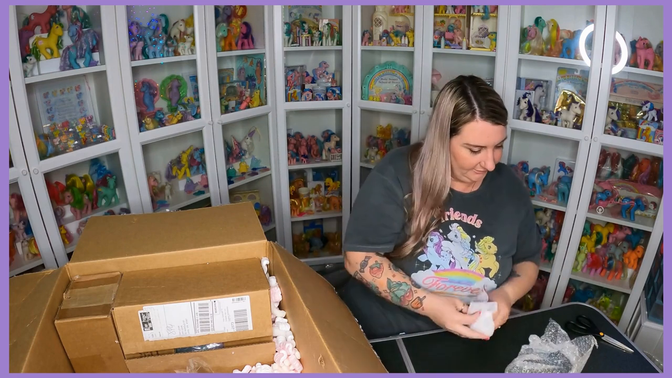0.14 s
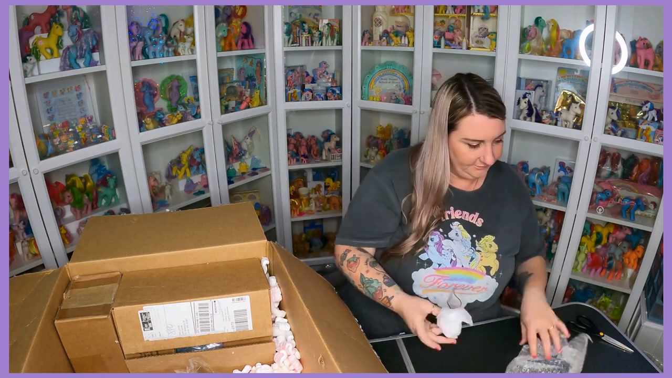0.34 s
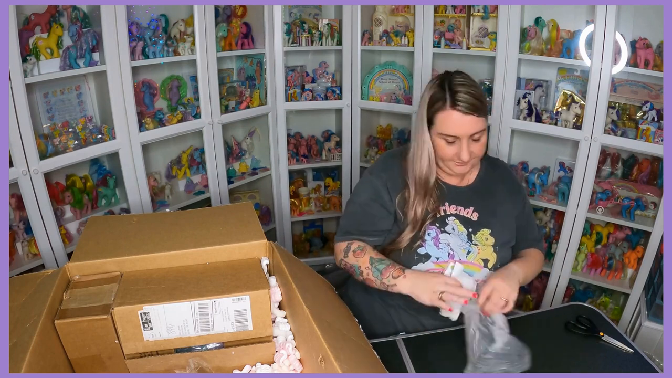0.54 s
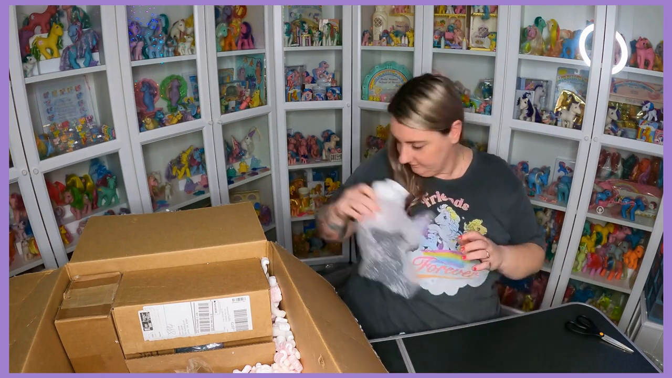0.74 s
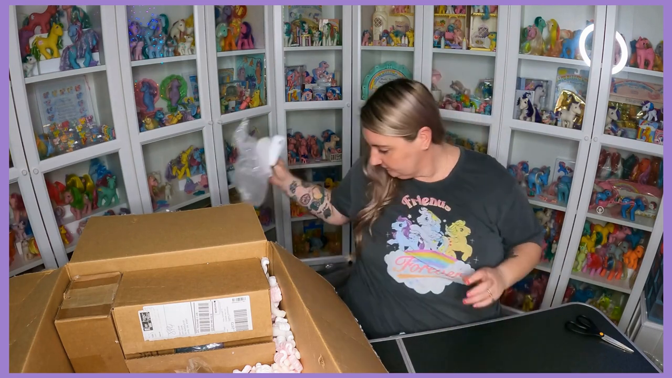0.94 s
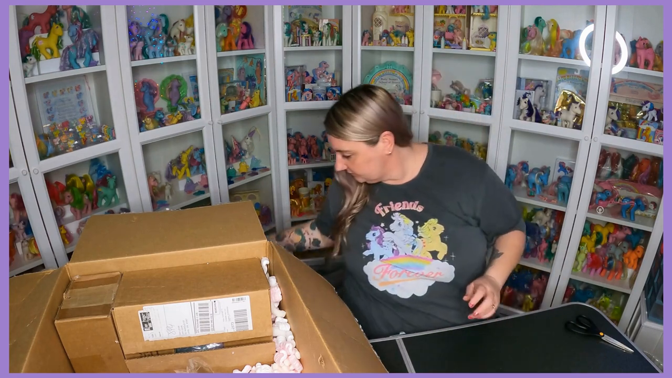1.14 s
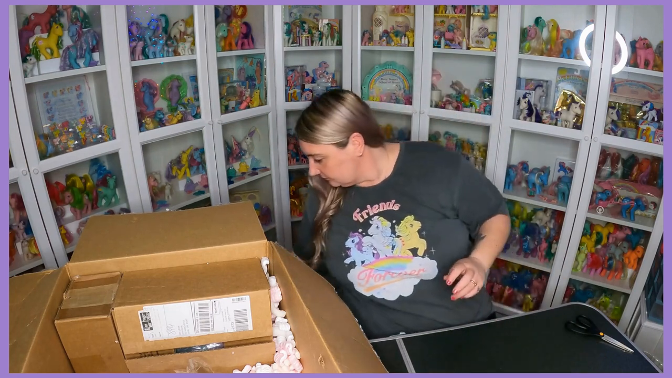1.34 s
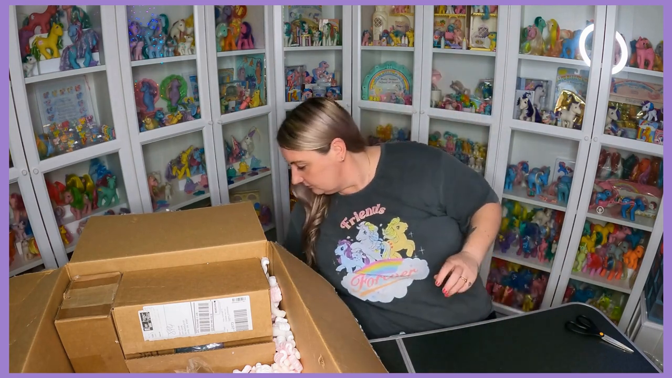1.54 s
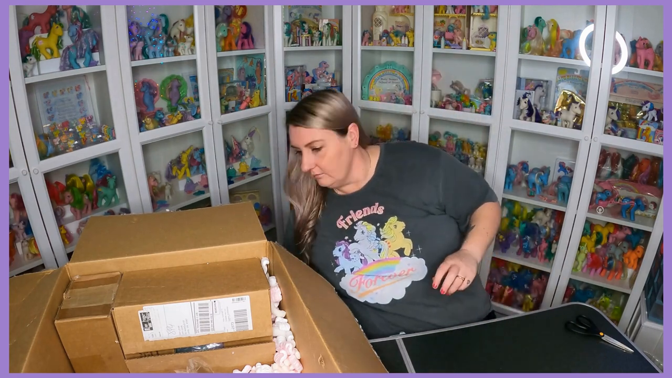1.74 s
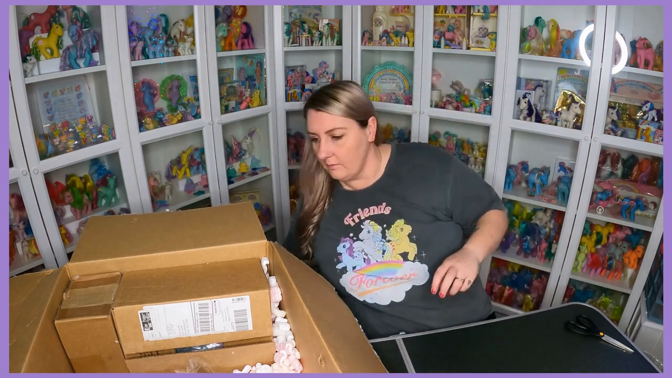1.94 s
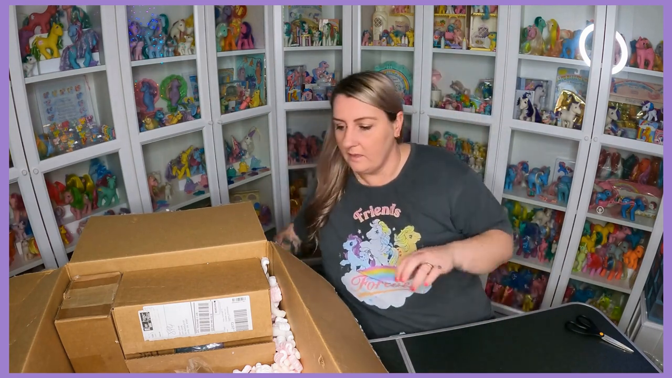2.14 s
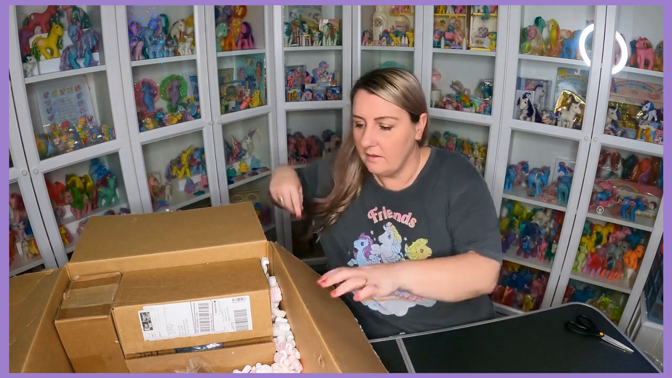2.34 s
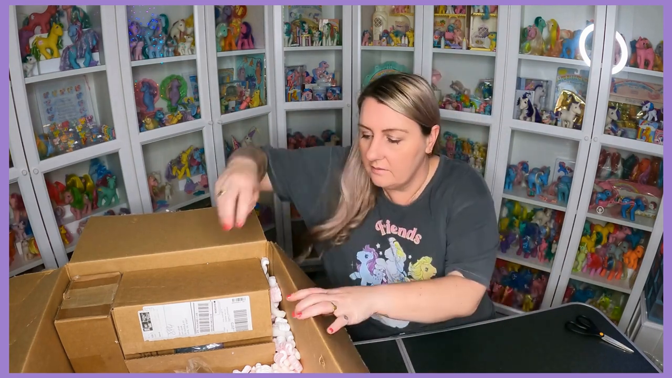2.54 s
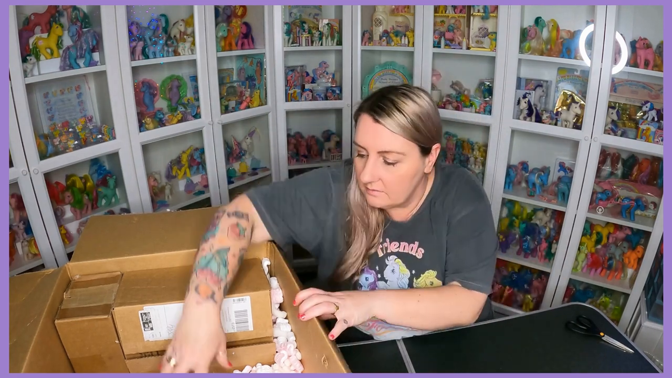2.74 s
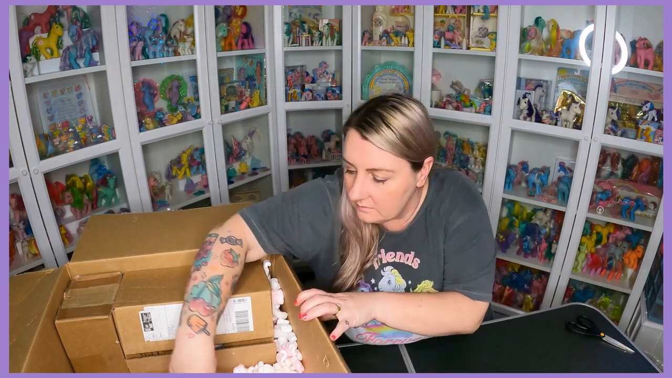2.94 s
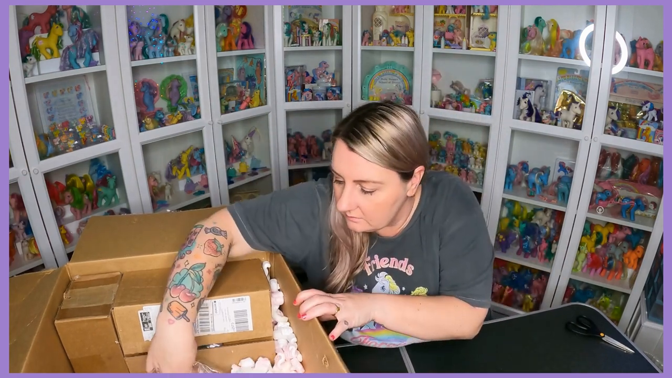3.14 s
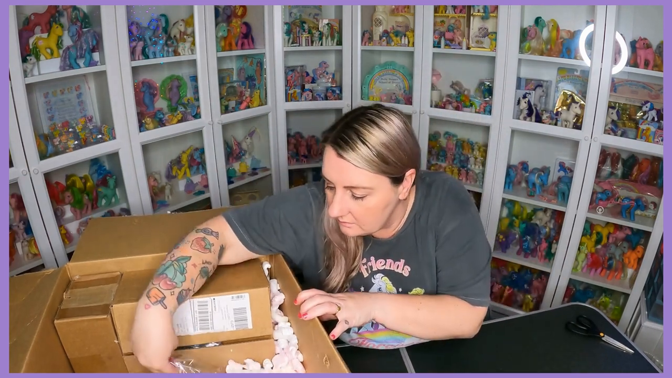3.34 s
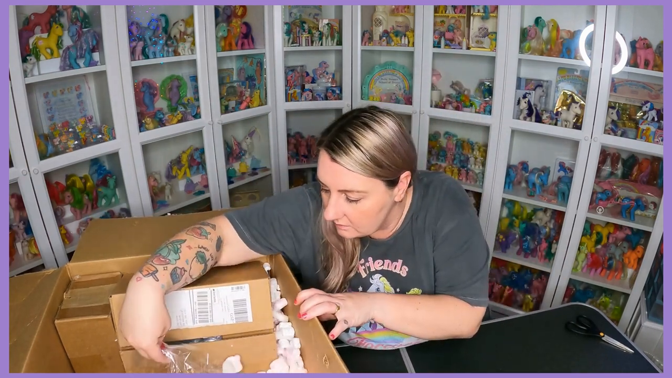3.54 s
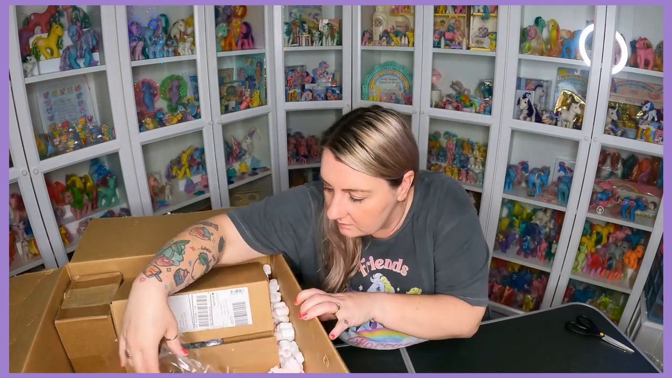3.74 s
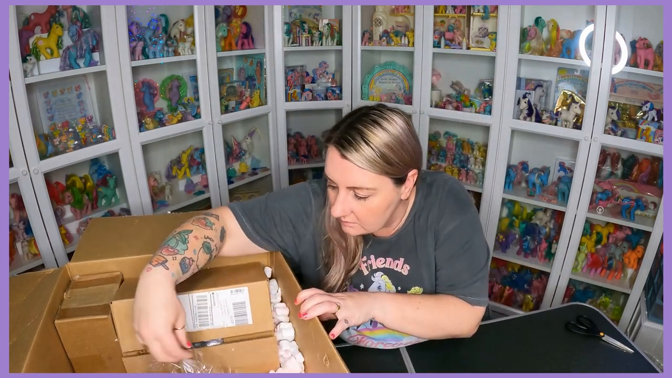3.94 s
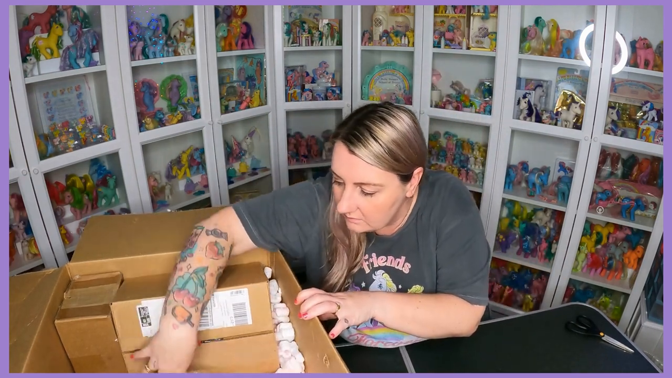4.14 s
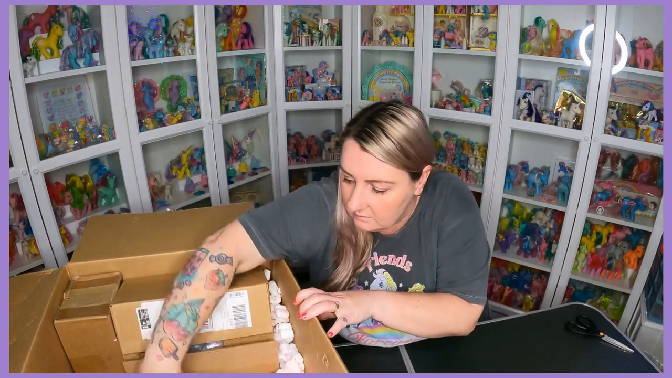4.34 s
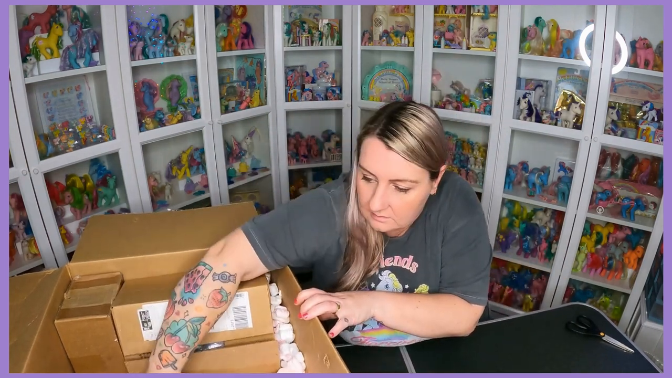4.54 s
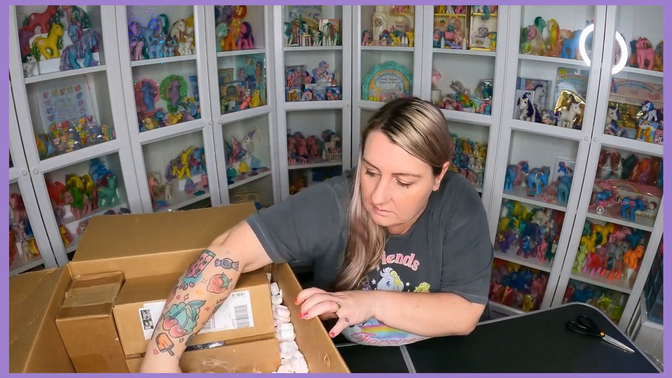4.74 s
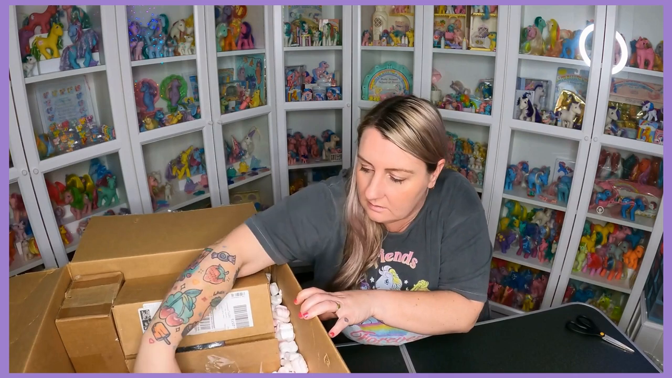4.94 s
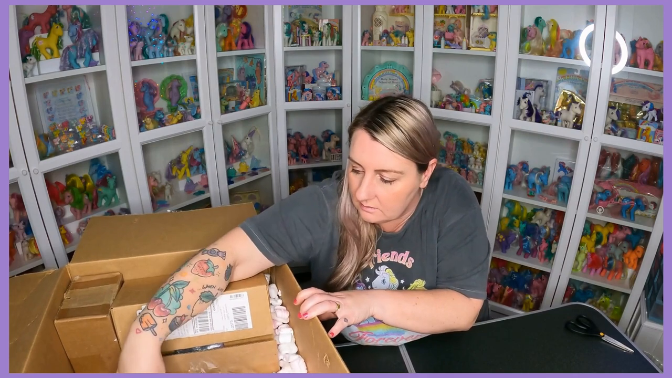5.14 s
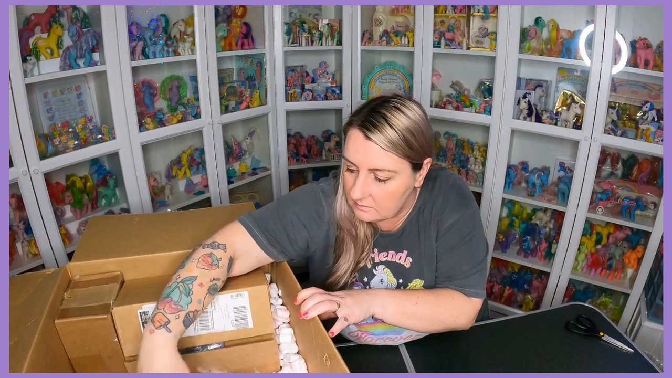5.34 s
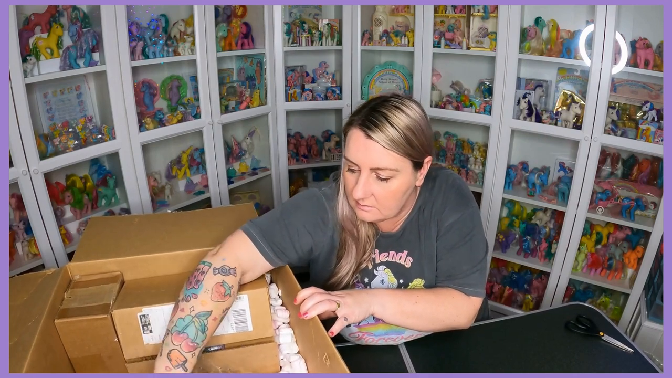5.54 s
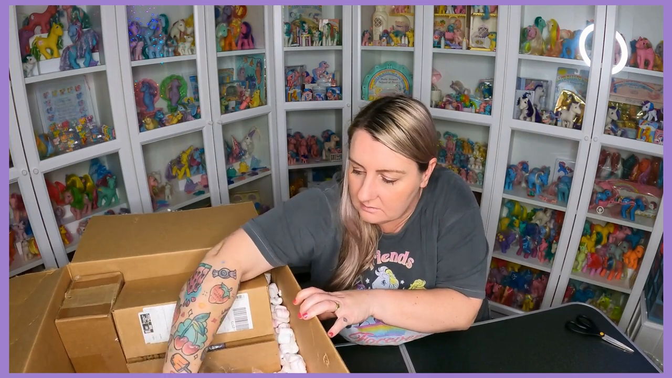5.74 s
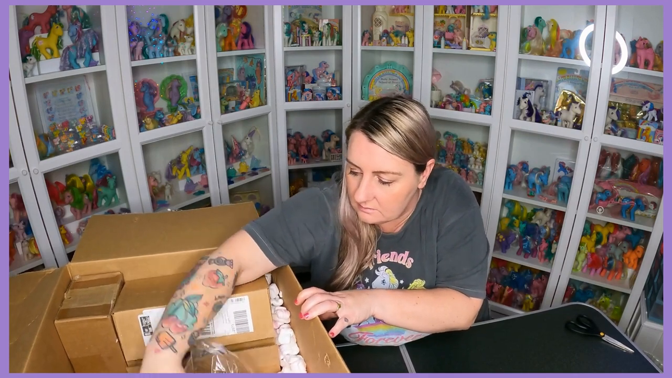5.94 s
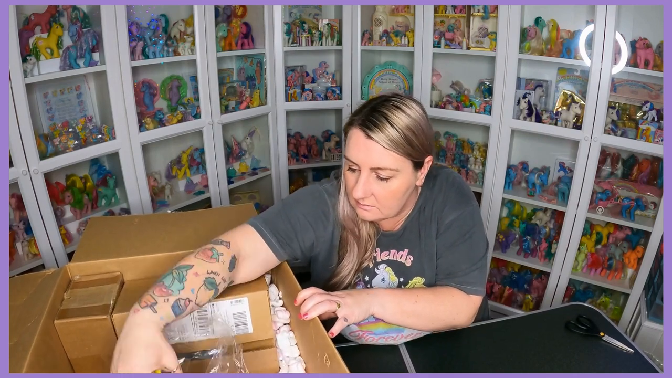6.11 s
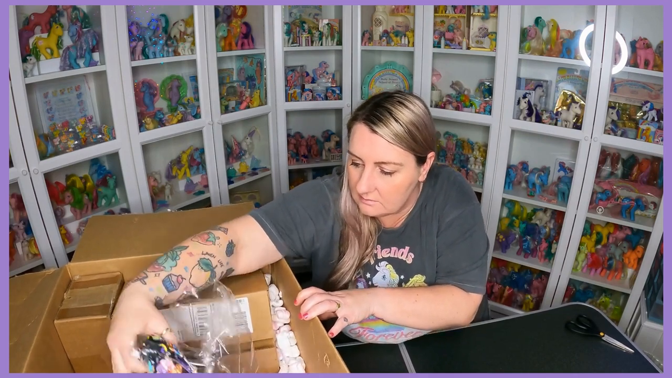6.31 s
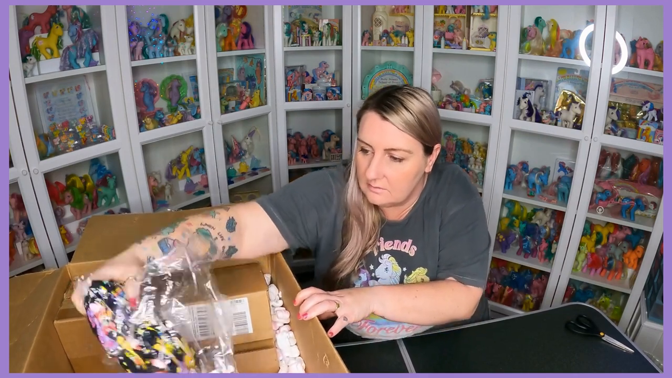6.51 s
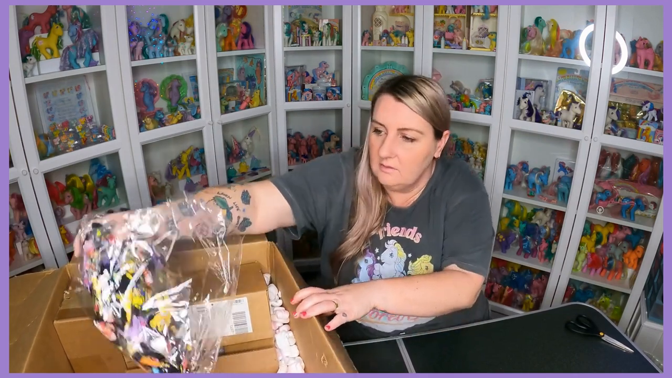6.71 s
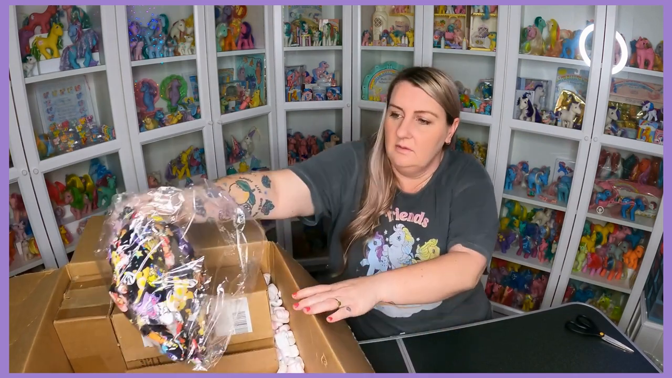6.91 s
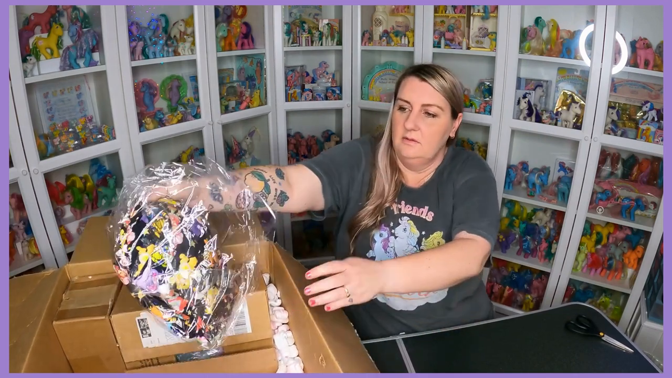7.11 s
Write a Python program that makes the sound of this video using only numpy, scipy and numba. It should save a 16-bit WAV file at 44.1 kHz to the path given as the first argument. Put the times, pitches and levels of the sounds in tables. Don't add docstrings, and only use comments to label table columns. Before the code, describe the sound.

Close stereo pickup of unpacking in a fairly dry little room. Faint wrapper crackles and a soft table knock come first, then a hollow clatter on the floor and a tiny glassy tap. Dense, bright plastic rustling suddenly takes over, mixed with rubbing foam and flapping cardboard; it builds to hard box thumps, then eases into looser crinkles as a bag is lifted.

```python
import sys
import numpy as np
from scipy import signal
from scipy.fft import rfft, irfft
from scipy.io import wavfile
from scipy.ndimage import map_coordinates
from numba import njit

SR = 44100
rng = np.random.default_rng(int(sys.argv[2]) if len(sys.argv) > 2 else 0)


def transcribe(u):
    v = np.clip(np.atleast_2d(u).T, -1, 1)
    q = np.round(v * 32767).astype(np.int16)
    wavfile.write(sys.argv[1], SR, q)


def voltage_ratio(level):
    return 10 ** (np.asarray(level, float) / 20)


N = 316197
T = np.arange(N) / SR
PORTS_S = 2.9e-5


def level(x, db):
    return x * voltage_ratio(db) / np.sqrt(np.mean(x ** 2))


def band(x, low_hz, high_hz, order=2):
    return signal.sosfilt(signal.butter(order, [low_hz, high_hz], "bandpass", fs=SR, output="sos"), x)


def colour_db(table, hz):
    table_hz, table_db = np.transpose(table)
    return np.interp(np.log(hz), np.log(table_hz), table_db)


@njit
def ring(s, hz, t60, left, right, turn, rise):
    out = np.zeros((2, N))
    for k in range(len(s)):
        i, z, soft = int(s[k] * SR), 1. + 0j, 1.
        fade = np.log(1000.) / (t60[k] * SR)
        p, q = np.exp(2j * np.pi * hz[k] / SR - fade), np.exp(-rise * fade)
        w = np.exp(1j * turn[k])
        for j in range(i, min(N, i + int(t60[k] * SR))):
            z, soft = z * p, soft * q
            out[0, j] += left[k] * (1 - soft) * z.imag
            out[1, j] += right[k] * (1 - soft) * (z * w).imag
    return out


def strike(s, hz, t60, db, pan_db=0., lag_s=0., rise=8.5):
    settings = np.broadcast_arrays(s, hz, t60, db, pan_db, lag_s)
    s, hz, t60, db, pan_db, lag_s = (a.astype(float).ravel() for a in settings)
    left, right = voltage_ratio(db + pan_db / 2), voltage_ratio(db - pan_db / 2)
    return ring(s, hz, np.maximum(t60, 1e-4), left, right, 2 * np.pi * hz * lag_s, rise)


def knocks(hits, modes, gain_db, pan_db, width, rattle_s):
    s, db, tilt_db = np.array(hits).T[:, :, None, None]
    hz, mode_db, t60 = np.transpose(modes)[:, :, None]
    pitch, lag, size = rng.standard_normal((len(hits), len(modes), 16, 3)).transpose(3, 0, 1, 2)
    ring_db = db + gain_db + mode_db + tilt_db * np.log2(hz / 1000) + 1.8 * size
    sound = strike(s + rattle_s * lag ** 2, hz * 2 ** (width * pitch), t60, ring_db, pan_db, rise=33.0)
    return band(sound, 220, 15000)


def strokes(s, swell_s, hold_s, db, fade_db_s):
    age = T[::64, None] - s
    swell = np.clip(age / swell_s, 0, 1)
    gain = swell * voltage_ratio(db - fade_db_s * np.maximum(age - swell_s - hold_s, 0))
    return np.interp(T, T[::64], np.sqrt((gain ** 2).sum(1)))


def avalanches(scatter_db, fade_s, count):
    when, chance = rng.random((count, 2)).T
    kicks = np.zeros(N)
    kicks[(when * N).astype(int)] = voltage_ratio(-scatter_db * np.log(1 - .97 * chance))
    activity = signal.lfilter([1], [1, -np.exp(-1 / (fade_s * SR))], kicks)
    return activity / activity.mean()


def grains(colour, cycles, scatter_db, spread_db, patchy_db, activity, count):
    when, pitch, size, side, life = rng.random((count, 5)).T
    folds = map_coordinates(rng.standard_normal((200, 8)), [when * 199, pitch * 7], order=1)
    hz = colour[0][0] * (colour[-1][0] / colour[0][0]) ** pitch
    t60 = cycles * 10.0 ** (life - .5) / hz
    db = colour_db(colour, hz) + 10 * np.log10(hz / t60) - scatter_db * np.log(1 - .995 * size)
    db = db + patchy_db * folds + 20 * np.log10(activity[(when * N).astype(int)])
    place = 2 * side - 1
    return strike(when * N / SR, hz, t60, db, spread_db * place, PORTS_S * place)


# pitch in Hz, level in dB per Hz.
AIR_COLOUR = [(30, -17), (100, -24), (150, 2.5), (230, -2), (700, -14), (1200, -7), (2500, -8.5),
              (5500, -10), (8500, -20), (15000, -23)]


def air():
    hz = np.maximum(np.fft.rfftfreq(N, 1 / SR), 1)
    mid, side = rfft(rng.standard_normal((2, N))) * voltage_ratio(colour_db(AIR_COLOUR, hz))
    side = side * np.minimum(hz / 290.0, .8)
    return level(irfft(np.array([mid + side, mid - side]), N), -55.5)


@njit
def echoes(x, lags, gain, damp):
    line, soft, out = np.zeros((8, 4096)), np.zeros(8), np.zeros((2, len(x)))
    for i in range(len(x)):
        total = 0.
        for k in range(8):
            soft[k] += (1 - damp) * (gain[k] * line[k, (i - lags[k]) & 4095] - soft[k])
            total += soft[k]
            out[k % 2, i] += soft[k]
        for k in range(8):
            line[k, i & 4095] = x[i] + soft[k] - total / 4
    return out


def room(sound):
    t60_s, damp, room_db = 0.26, 0.47, -10
    lags = rng.integers(400, 2600, 8)
    tail = echoes(band(sound.mean(0), 530, 21000), lags, voltage_ratio(-60 * lags / SR / t60_s), damp)
    return voltage_ratio(room_db + np.array([[.8], [-.8]])) * tail


# start in seconds, hold in seconds, rumble level in dB.
TABLE_JOLTS = [(0.433, 0.12, -61), (1.032, 0.054, -51.5), (1.49, 0.03, -57), (1.69, 0.0, -55),
               (1.774, 0.0, -51), (2.178, 0.0, -66), (2.543, 0.12, -58), (3.053, 0.082, -53),
               (3.182, 0.0087, -49), (3.465, 0.072, -54), (3.616, 0.039, -50.5), (3.807, 0.03, -53),
               (4.102, 0.029, -55), (4.225, 0.0088, -41.5), (4.345, 0.16, -52), (4.634, 0.15, -43),
               (4.782, 0.0, -41), (5.151, 0.026, -51), (5.526, 0.097, -49), (5.72, 0.07, -51),
               (5.866, 0.16, -30.5), (5.95, 0.035, -26.5), (6.06, 0.02, -44), (6.457, 0.2, -68),
               (6.907, 0.034, -55), (7.024, 0.039, -44.5)]


def table_rumble(hand):
    s, hold_s, db = np.transpose(TABLE_JOLTS)
    swell_s, fade_db_s, steady_db = 0.02, 238, -37
    jolts = np.hypot(strokes(s, swell_s, hold_s, db, fade_db_s), voltage_ratio(steady_db) * hand)
    rumble = rng.standard_normal(N) + 0.15 * rng.standard_normal((2, N))
    return jolts * level(band(rumble, 34, 118), -0.66)


# start in seconds, peak level in dB, pitch in Hz, decay time t60 in seconds.
BOX_THUDS = [(0.184, -44, 177, 0.12), (0.47, -22, 161, 0.12), (1.048, -39, 214, 0.3),
             (1.517, -34, 212, 0.24), (1.639, -29, 179, 0.12), (1.796, -32, 254, 0.17),
             (1.918, -33.5, 246, 0.12), (2.209, -33.5, 226, 0.072), (2.564, -54, 48.4, 0.12),
             (2.599, -35, 29.6, 0.12), (2.634, -35, 29.6, 0.12), (2.666, -38, 32.3, 0.13),
             (4.228, -28, 317, 0.08), (4.375, -17.5, 257, 0.058), (4.376, -18, 576, 0.032),
             (4.668, -15, 165, 0.047), (4.671, -16, 564, 0.05), (5.878, -21.5, 119, 0.072),
             (5.916, -12, 165, 0.086), (5.932, -12, 131, 0.13), (5.974, -13, 62, 0.1),
             (5.922, -16, 905, 0.03), (5.978, -13.5, 683, 0.023), (5.981, -12, 1087, 0.042),
             (5.911, -13.5, 1460, 0.036), (5.916, -12.5, 472, 0.05), (5.99, -6.5, 144, 0.042),
             (5.979, -15, 311, 0.097), (5.72, -19, 227, 0.063), (5.16, -25.5, 427, 0.043),
             (6.148, -24, 245, 0.034), (6.15, -24, 950, 0.04), (7.085, -30, 710, 0.05),
             (7.069, -20.5, 197, 0.04)]


def thuds():
    s, db, hz, t60 = np.transpose(BOX_THUDS)
    low_mode = strike(s, hz, t60, db - 4.0, 0.43 * np.sin(7 * s), rise=8.1)
    upper_mode = strike(s, 1.3 * hz, 2.5 * t60, db - 16.5, .8, rise=6.7)
    slap = strike(s, 2.04 * hz, 0.5 * t60, db - 14.5, .8, rise=8.9)
    return -low_mode - upper_mode - slap


# start in seconds, peak level in dB, brightness in dB per octave.
FLOOR_BOUNCES = [
    (1.362, -32.5, -1),
    (1.434, -26.5, 5),
    (1.538, -13.5, -1.5),
    (1.548, -17.5, 1),
    (1.575, -25, -2.5),
    (1.78, -20, 1.5),
    (1.925, -38, 2),
]
# pitch in Hz, level in dB, decay time t60 in seconds.
HOLLOW_MODES = [(367, -2.5, 0.12), (908, 2, 0.092), (1126, 0, 0.14), (1396, -4, 0.08), (1710, -3, 0.092),
                (2540, -3, 0.05), (3590, -14, 0.05), (5050, -19, 0.03)]


def hollow_drop():
    return knocks(FLOOR_BOUNCES, HOLLOW_MODES, -21.0, 3.8, 0.111, 0.0044)


# start in seconds, peak level in dB, brightness in dB per octave.
GLASS_TAPS = [
    (2.3165, -25.5, 0.7),
    (2.333, -34, 0),
]
# pitch in Hz, level in dB, decay time t60 in seconds.
GLASS_MODES = [(1264, -9.5, 0.069), (2580, -11, 0.041), (3790, -3.5, 0.045), (5370, -1, 0.038),
               (6540, -3, .04), (7800, 2.5, 0.052), (8700, -3, 0.065), (11800, 1, 0.057), (14000, -9, .03)]


def glass_tick():
    ping = knocks(GLASS_TAPS, GLASS_MODES[1:], -19.0, -1.7, 0.19, 0.00068)
    chatter = knocks(GLASS_TAPS, GLASS_MODES[:1], -13.0, -1.5, 0.14, .005)
    return ping + chatter


# pitch in Hz, level in dB per Hz.
WALL_COLOUR = [(120, -16), (170, 2.5), (280, 4), (480, -0.5)]


def box_walls(bursts):
    flaps = grains(WALL_COLOUR, 8.6, 0.8, 1.6, 0.95, 0.7 + 0.23 * bursts, count=2400)
    return level(band(flaps, 140, 730, order=3), -0.25)


# pitch in Hz, level in dB per Hz.
FOAM_COLOUR = [(420, -4), (700, -5), (1050, -2.5), (1800, -10), (4000, -17)]


def foam_peanuts(bursts):
    tumble = grains(FOAM_COLOUR, 25.3, 0.42, 3.7, 2.2, 1.3 + 0.15 * bursts, count=13000)
    return level(band(tumble, 420, 3560), -1.28)


# pitch in Hz, level in dB per Hz.
FILM_COLOUR = [(1200, -9), (2200, -5), (3200, -6.5), (4500, -2.5), (6500, -5), (8000, -6.5), (10000, -11),
               (12500, -11.5), (15000, -16)]


def plastic_film(bursts, crisp):
    rustle = grains(FILM_COLOUR, 17.0, 0.6, 1.5, 2.0, 0.99 + 0.13 * bursts, count=60000)
    ticks = grains(FILM_COLOUR[:6], 1.4, 0.44, 18.0, 0.77, .5 + 0.05 * bursts, count=2500)
    return band(level(rustle, -0.41) + crisp * level(ticks, -8.0), 960, 15700)


# start in seconds, peak level in dB, pitch in Hz.
LOUD_CREASES = [(.2078, -28, 4010), (.2855, -28, 4000), (.4573, -26, 2800), (.508, -21, 3490),
                (.5774, -23, 2800), (.7073, -24, 4720), (1.0558, -25, 5510), (1.361, -33, 2500),
                (1.4356, -24, 1660), (1.5389, -20, 1500), (1.5512, -21, 1380), (1.7791, -25, 2110),
                (1.785, -21, 5210), (2.3163, -19, 6800), (2.5603, -39, 1640), (2.605, -29, 3440),
                (2.6174, -30, 1850), (2.7225, -33, 1720), (2.7535, -24, 4500), (2.7613, -30, 5120),
                (2.8899, -37, 2840), (2.9097, -33, 4260),
                (2.9471, -28, 1680), (2.9532, -22, 1720), (2.9725, -17, 5340), (2.9803, -14, 5680),
                   (3.0141, -11, 5860), (3.0373, -10, 6760), (3.0544, -11, 5900), (3.0678, -9, 4010),
                   (3.101, -10, 5340), (3.1436, -11, 4820), (3.2078, -14, 3010), (3.2195, -15, 2410),
                   (3.2286, -15, 2200), (3.2405, -12, 4950), (3.3123, -16, 2760), (3.3464, -16, 4690),
                   (3.374, -11, 2450), (3.3836, -14, 6800), (3.4308, -17, 7450), (3.4474, -14, 4570),
                   (3.4675, -14, 4090), (3.4868, -11, 8700), (3.5395, -13, 3750), (3.5474, -13, 4050),
                   (3.5843, -15, 2370), (3.6062, -13, 5210), (3.622, -15, 2070), (3.6406, -16, 5510),
                   (3.6574, -17, 2070), (3.7101, -13, 2630), (3.8028, -23, 2840), (3.8835, -14, 3570),
                   (3.8917, -13, 2670), (3.9007, -13, 4090), (3.9295, -20, 7020), (3.9532, -26, 4650),
                   (3.969, -24, 3830), (4.0196, -32, 5900), (4.0607, -25, 4090), (4.1212, -14, 4390),
                   (4.1561, -12, 2070), (4.1819, -12, 5860), (4.1959, -11, 2930), (4.2504, -12, 4310),
                   (4.2838, -15, 1890), (4.3246, -12, 2670), (4.3446, -16, 1720), (4.394, -14, 6680),
                   (4.4045, -14, 5430), (4.4118, -12, 1850), (4.461, -20, 2240), (4.5438, -17, 4180),
                   (4.5597, -22, 6630), (4.5663, -20, 6240), (4.5956, -25, 6680),
                (4.6042, -21, 6930), (4.617, -21, 5770), (4.6486, -12, 5510), (4.7373, -10, 7360),
                   (4.7687, -11, 4310), (4.788, -10, 4180), (4.8106, -10, 2540), (4.8239, -14, 2200),
                   (4.8415, -14, 2580), (4.8867, -16, 4260), (4.9025, -14, 5170), (4.9105, -9, 2670),
                   (4.9708, -9, 2500), (5.0128, -15, 3010), (5.0499, -14, 6850), (5.0615, -13, 4050),
                   (5.0785, -12, 2630), (5.0881, -12, 8440), (5.1111, -17, 6240), (5.1605, -11, 1720),
                   (5.1921, -14, 5510), (5.1988, -8, 4010), (5.2268, -17, 5730), (5.2341, -15, 5510),
                   (5.2411, -18, 3570), (5.2754, -14, 4870), (5.2909, -17, 5340), (5.3133, -18, 4260),
                   (5.3208, -16, 4090), (5.3287, -15, 7410), (5.3603, -17, 5640), (5.412, -21, 1810),
                   (5.4464, -17, 3360), (5.4593, -19, 3660), (5.4654, -19, 6550), (5.5033, -19, 5770),
                   (5.5247, -12, 1940), (5.5311, -10, 5210), (5.5371, -8, 3960), (5.5997, -11, 4740),
                   (5.6346, -11, 5170), (5.6721, -9, 5170), (5.7073, -13, 4180), (5.7172, -11, 5860),
                   (5.7231, -9, 1940), (5.7567, -14, 3790), (5.7845, -8, 4820), (5.845, -10, 6030),
                   (5.8561, -11, 3230), (5.8722, -12, 6720),
                (5.91, -5, 6850), (5.9215, -8, 4740), (5.9368, -10, 5210), (5.9547, -10, 4010),
                   (5.9785, -8, 2280), (6.0593, -18, 1940), (6.1513, -15, 1770), (6.1599, -17, 3010),
                   (6.1921, -16, 7450), (6.2252, -17, 4910), (6.2374, -22, 3100), (6.2455, -21, 4260),
                   (6.2635, -17, 5940), (6.28, -21, 4390), (6.2917, -19, 3880), (6.308, -22, 2760),
                   (6.315, -18, 4090), (6.356, -25, 6160), (6.3828, -26, 2630), (6.3903, -28, 3920),
                   (6.4218, -20, 4090), (6.4321, -19, 6930), (6.452, -20, 1460), (6.4615, -17, 4010),
                   (6.4848, -15, 6760), (6.4917, -15, 5340), (6.5298, -17, 3230), (6.5718, -17, 5170),
                   (6.5872, -19, 4260), (6.5939, -18, 6460), (6.6081, -18, 6890), (6.6543, -16, 4780),
                   (6.6821, -15, 4480), (6.6996, -15, 5510), (6.7579, -18, 3360), (6.7931, -18, 4010),
                   (6.8079, -19, 1590), (6.8246, -17, 1380), (6.839, -12, 4740), (6.9648, -12, 3790),
                   (7.0072, -16, 2070), (7.0137, -17, 5040), (7.0282, -19, 5770), (7.0439, -11, 4090),
                   (7.0656, -14, 4130), (7.0784, -16, 4010), (7.0948, -13, 1420), (7.115, -15, 5250),
                   (7.1217, -15, 4480), (7.1432, -22, 3360)]


def crease_snaps(octaves=0.91, cycles=6.4, spread_s=0.001586):
    s, db, hz = np.array(LOUD_CREASES).T
    lag, pitch, side = rng.random((len(s), 10, 3)).transpose(2, 0, 1)[..., None]
    ring_hz = np.clip(hz[:, None, None] * 2 ** (octaves * (2 * pitch - .7)), 900., 9500.)
    out, age = np.zeros((2, N + 512)), np.arange(512) / SR
    first = (s * SR).astype(int)[:, None]
    for channel, late_s in enumerate([0, PORTS_S * (2 * side[:, :1] - 1)]):
        turns = np.maximum(age - spread_s * lag ** 2 - late_s, 0) * ring_hz
        fade = voltage_ratio(-8.0 * lag - 60 * turns / cycles)
        crack = (fade * turns * np.sin(2 * np.pi * turns) * ring_hz ** 0.4).sum(1)
        crack *= (voltage_ratio(db - 1.0) / np.abs(crack).max(1))[:, None]
        np.add.at(out[channel], first + np.arange(512), crack)
    return out[:, :N]


# start in seconds, swell in seconds, hold in seconds, film level in dB, low rustle over film in dB.
WRAPPER_STROKES = [(-0.047, 0.039, 0.089, -47, -19), (0.171, 0.023, 0, -36, -12),
                   (0.262, 0.015, 0.02, -38, -14), (0.33, 0.02, 0.07, -44, -14),
                   (0.452, 0.014, 0.055, -33.5, -9.5), (0.56, 0.02, 0, -37.5, -31),
                   (0.687, 0.033, 0.0059, -32, -9), (0.616, 0.018, 0.055, -44.5, -16),
                   (0.757, 0.012, 0.085, -40, -22), (0.972, 0.035, 0.12, -41.5, -21),
                   (1.055, 0.0047, 0.011, -36, -4), (1.085, 0.011, 0, -41, -14),
                   (1.184, 0.1, 0.09, -48, -28), (1.357, 0.02, 0.08, -35, -5.5),
                   (1.403, 0.028, 0.21, -45, 7), (1.644, 0.004, 0.094, -47, 5),
                   (1.773, 0.0069, 0.0, -35.5, -2.5), (1.907, 0.006, 0.16, -48, 4),
                   (2.17, 0.027, 0.0, -59, 10.5), (2.433, 0.012, 0.015, -65.5, 6),
                   (2.55, 0.0026, 0.083, -62.5, 13.5), (2.601, 0.0036, 0, -43, -13),
                   (2.702, 0.01, 0.005, -45, -0.5), (2.747, 0.004, 0, -41.5, 0.5),
                   (2.885, 0.024, 0.0, -48.5, 4.5)]
# start in seconds, swell in seconds, hold in seconds, film level in dB.
DIGGING_STROKES = [(2.94, 0.036, 0.18, -27), (3.005, 0.031, 0.2, -27), (3.275, 0.076, 0.047, -31),
                   (3.324, 0.046, 0.14, -28), (3.447, 0.015, 0.037, -32), (3.523, 0.0066, 0.094, -27),
                   (3.6, 0.037, 0.068, -28.5), (3.767, 0.08, 0.037, -24.5), (4.011, 0.0063, 0.0056, -46.5),
                   (4.054, 0.042, 0.065, -27.5), (4.179, 0.004, 0.073, -25), (4.275, 0.0045, 0.053, -31.5),
                   (4.352, 0.034, 0.047, -26.5), (4.467, 0.038, 0.076, -34), (4.534, 0.01, 0.027, -37.5),
                   (4.614, 0.029, 0.17, -26.5), (4.71, 0.0064, 0.14, -27.5), (4.859, 0.021, 0.1, -28),
                   (4.92, 0.14, 0.14, -29), (5.112, 0.014, 0.15, -32.5), (5.17, 0.0092, 0.011, -31),
                   (5.267, 0.072, 0.017, -26.5), (5.383, 0.064, 0.013, -29.5)]
# start in seconds, swell in seconds, hold in seconds, film level in dB.
LIFTING_STROKES = [(5.508, 0.016, 0.14, -25), (5.612, 0.01, 0.0034, -26.5), (5.689, 0.0068, 0.11, -25.5),
                   (5.831, 0.0099, 0.052, -24.5), (5.902, 0.006, 0.12, -27.5), (6.072, 0.061, 0, -28.5),
                   (6.133, 0.008, 0, -31.5), (6.235, 0.043, 0.0, -31), (6.325, 0.069, 0.0, -45.5),
                   (6.408, 0.043, 0.025, -33.5), (6.504, 0.022, 0.11, -33), (6.604, 0.086, 0.019, -28.5),
                   (6.74, 0.03, 0.06, -36), (6.822, 0.016, 0, -28), (6.874, 0.028, 0.051, -29),
                   (6.948, 0.01, 0.065, -36), (7.022, 0.041, 0.019, -27.5), (7.098, 0.0055, 0, -35)]
# time in seconds, left minus right in dB.
HAND_PLACE = [(0.0, -1), (0.86, -0.5), (1.0, 1), (1.26, 1.5), (2.1, 1), (2.25, 2), (2.74, -0.5), (2.91, 1),
              (4.53, 1), (7.17, 1.5)]


def rummage():
    s, swell_s, hold_s, db, low_db = np.transpose(WRAPPER_STROKES)
    wrapper = strokes(s, swell_s, hold_s, db, fade_db_s=119.5)
    low = strokes(s, swell_s, hold_s, db + low_db, fade_db_s=119.5)
    digging = strokes(*np.transpose(DIGGING_STROKES), fade_db_s=225)
    lifting = strokes(*np.transpose(LIFTING_STROKES), fade_db_s=116)
    hand = np.sqrt(wrapper ** 2 + digging ** 2 + lifting ** 2)
    foam_over_film_db, walls_over_foam_db = -7, -6
    stirred = voltage_ratio(foam_over_film_db) * np.hypot(digging, lifting)
    foam_motion = np.hypot(low, stirred)
    pan_db = np.interp(T, *np.transpose(HAND_PLACE)) * np.array([[.5], [-.5]])

    crisp = np.where(T < DIGGING_STROKES[0][0], 0.7, 1)
    bursts = 1 + crisp * (avalanches(scatter_db=3.0, fade_s=.005, count=900) - 1)
    bags = hand * voltage_ratio(1.8 * pan_db) * plastic_film(bursts, crisp) + voltage_ratio(pan_db) * crease_snaps()
    foam = foam_motion * voltage_ratio(0.68 * pan_db) * foam_peanuts(bursts)
    box = voltage_ratio(walls_over_foam_db) * foam_motion * box_walls(bursts)
    return bags + foam + box + table_rumble(hand)


def scene():
    tick = glass_tick()
    near = rummage() + hollow_drop() + tick
    return near + room(near + voltage_ratio(2.5) * tick) + thuds() + air()


# pitch in Hz, share of narrow bands left empty from 0 to 1.
TREBLE_GAPS = [(9000, 0), (10300, .13), (13500, .2), (15000, .45), (15800, .8)]


def starve(x):
    hz, s, bins = signal.stft(x, SR, nperseg=1024)
    luck = rng.random((len(hz) // 14 + 1, len(s) // 3 + 1))
    luck = luck.repeat(14, 0).repeat(3, 1)[:len(hz), :len(s)]
    empty = luck < np.interp(hz, *np.transpose(TREBLE_GAPS))[:, None]
    return signal.istft(bins * np.where(empty, .006, 1), SR, nperseg=1024)[1][:, :N]


# pitch in Hz, gain in dB.
MIC_RESPONSE = [(30, -0.5), (7400, 0.5), (8300, -3), (12000, -4.5), (15000, -7.5)]


def microphone(x):
    hz = np.maximum(np.fft.rfftfreq(N, 1 / SR), 1)
    heard = irfft(rfft(x) * voltage_ratio(colour_db(MIC_RESPONSE, hz)), N)
    top = signal.ellip(10, .3, 80, 15800, fs=SR, output="sos")
    return signal.sosfilt(top, heard)


def band_limit(x):
    return signal.sosfilt(signal.butter(12, 16030, fs=SR, output="sos"), x)


def record(dry):
    return band_limit(starve(microphone(dry)))


dry = scene()
out = record(dry)
transcribe(out)
```